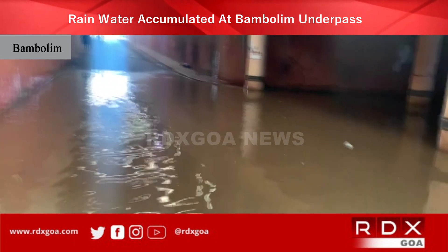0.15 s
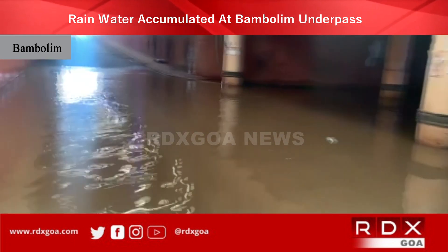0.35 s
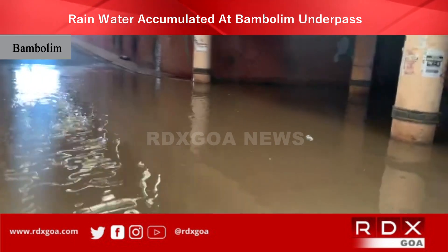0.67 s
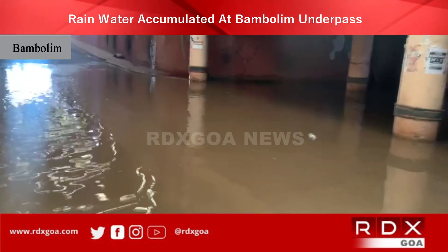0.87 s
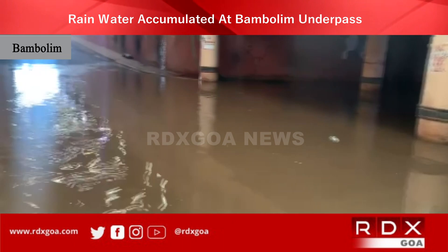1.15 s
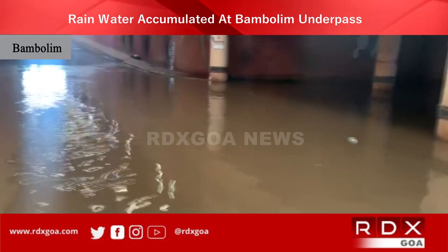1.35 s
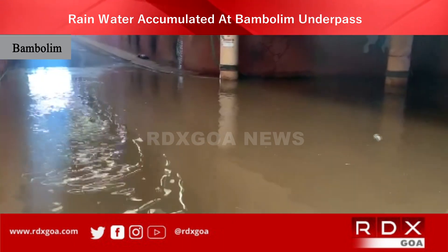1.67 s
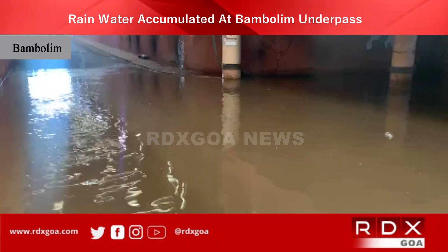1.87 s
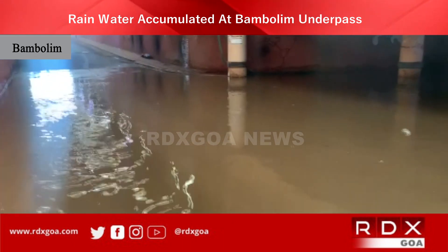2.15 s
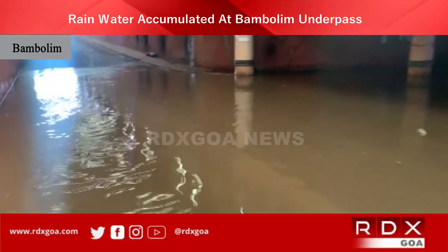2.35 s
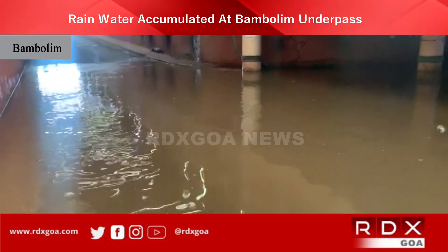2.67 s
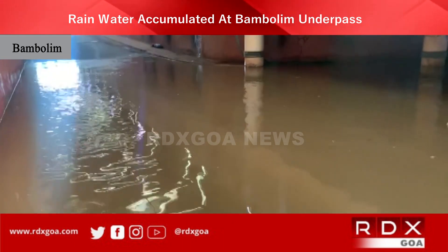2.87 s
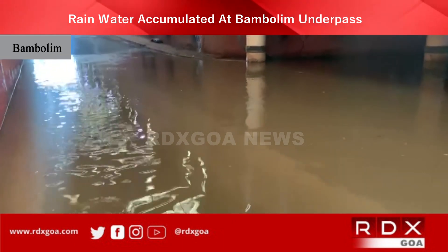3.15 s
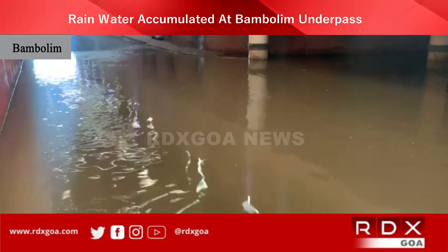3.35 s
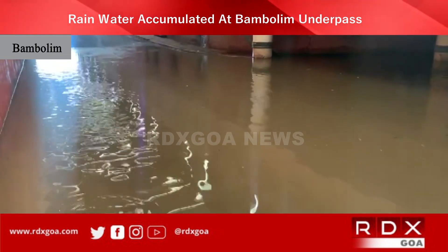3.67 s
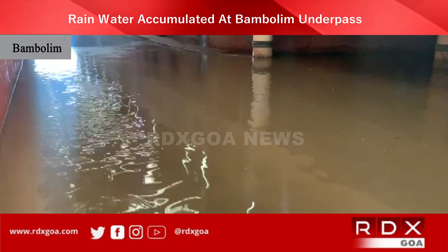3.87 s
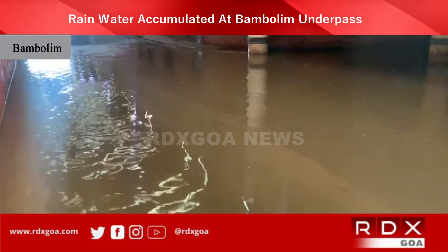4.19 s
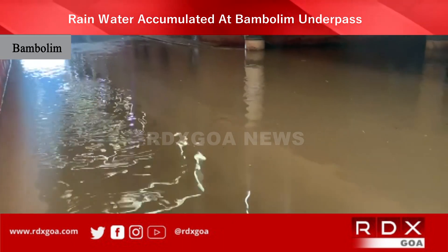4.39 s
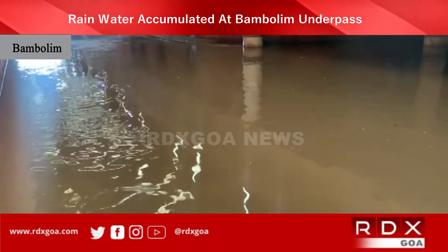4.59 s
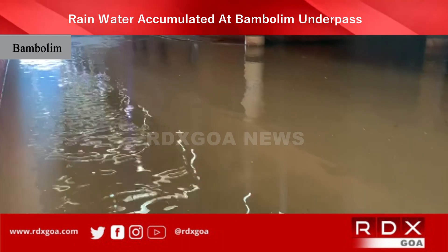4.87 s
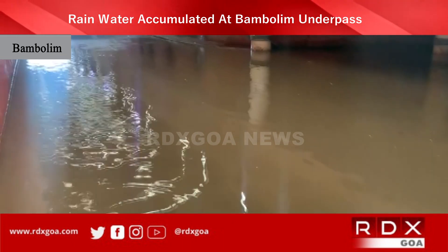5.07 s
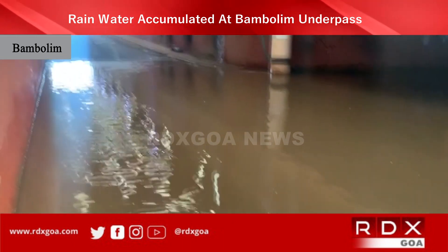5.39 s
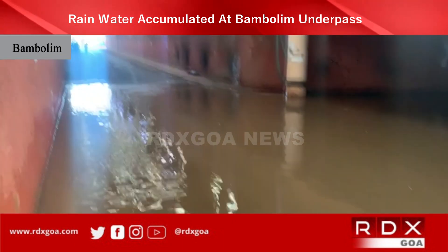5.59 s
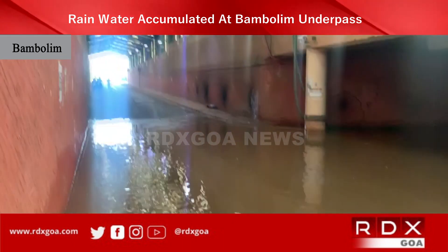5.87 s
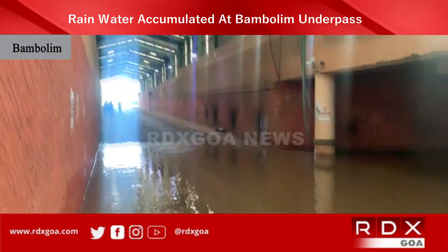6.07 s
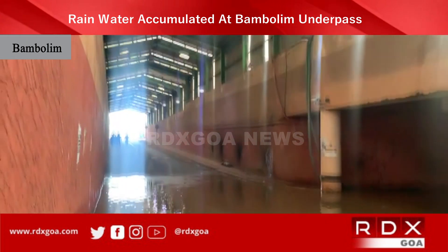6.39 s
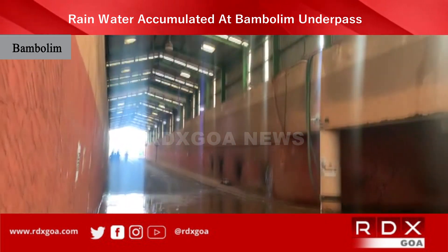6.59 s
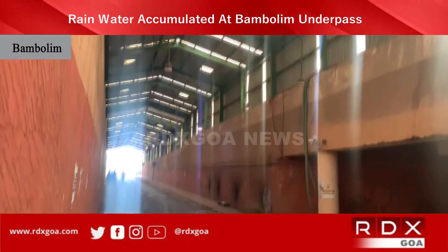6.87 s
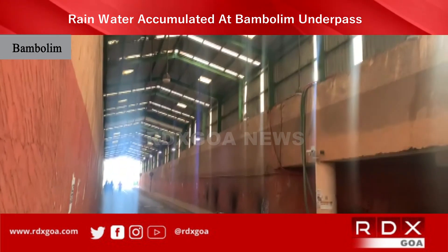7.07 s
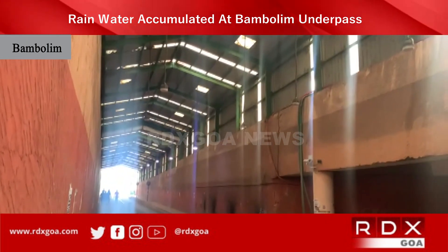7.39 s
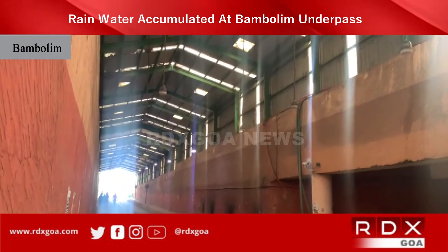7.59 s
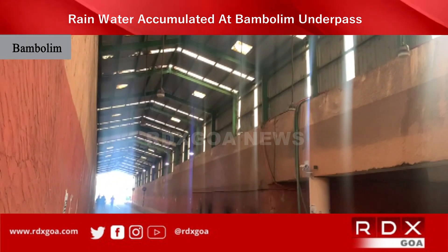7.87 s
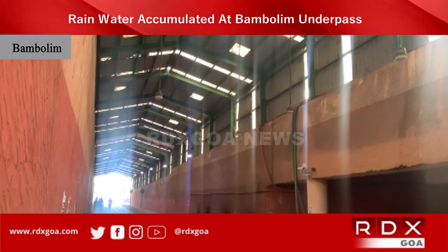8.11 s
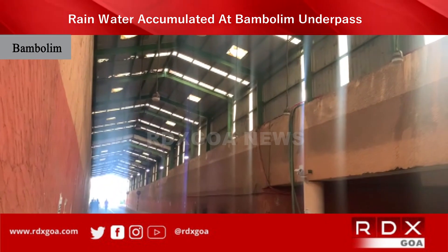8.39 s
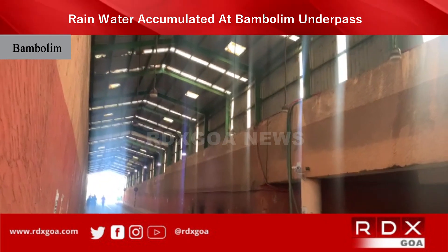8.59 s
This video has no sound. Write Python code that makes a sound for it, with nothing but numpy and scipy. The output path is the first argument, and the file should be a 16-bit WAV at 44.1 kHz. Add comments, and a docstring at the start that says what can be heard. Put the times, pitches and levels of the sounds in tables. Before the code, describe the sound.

A single-cylinder engine idles near the microphone in a flooded concrete underpass, about ten soft thuds a second, wavering in pace and booming off the walls. Quieter water churns behind it, surging around one and a half, five, six and eight seconds, with bubbles and tiny splashes. A far engine growl vanishes early; thin sizzle fades after three seconds. Distant traffic drones and whines.

```python
"""A single-cylinder engine idles in a flooded concrete underpass: each firing rings the exhaust and the
tunnel's standing waves, split into boom and thud; two higher bands clatter in the tunnel's dense echoes.
Wheels push through water: coloured noise with drops, lifted in surges, with bubble pings and noise splashes.
A thin sizzle of narrow-band noise fades out, and so does a far engine's growl of blurred partials.
Distant traffic whines in wavering, blurred tones over a deep drone of low noise."""
import sys
import numpy as np
from scipy import signal
from scipy.fft import rfft, irfft, next_fast_len
from scipy.io import wavfile
from scipy.ndimage import uniform_filter1d

SR = 44100
rng = np.random.default_rng(int(sys.argv[2]) if len(sys.argv) > 2 else 0)


def materialize(psi):
    """Save the field psi as 16-bit PCM at rate SR to the path in sys.argv[1].

    A 1-D psi becomes a single channel; in a 2-D psi each row is a channel.
    """
    bounded = np.clip(np.atleast_2d(psi).T, -1, 1)
    quanta = np.round(bounded * 32767).astype(np.int16)
    wavfile.write(sys.argv[1], SR, quanta)


N = 385434
TIME = np.arange(N) / SR

# Hunting idle. Each row: time in seconds, rate in firings per second.
FIRING_RATE = [(0.0, 9.61), (.3, 10), (.6, 10), (.85, 9.2), (1.15, 10.4), (1.45, 9.7), (1.8, 9.8),
               (2.1, 9.69), (2.45, 9.463), (3.1, 10.27), (3.96, 9.905), (4.73, 10.246), (5.11, 9.796),
               (5.77, 9.457), (6.175, 10.489), (6.5, 10.653), (6.88, 9.145), (7.25, 10.418), (8.04, 9.203),
               (8.74, 9.749)]
START_PHASE_FIRINGS = .001


def firings(uneven_db, stumble_s):
    """One impulse per firing, randomly uneven in strength and a little early or late."""
    phase = START_PHASE_FIRINGS + np.cumsum(curve(FIRING_RATE, column=1)) / SR
    at = np.flatnonzero(np.diff(np.floor(phase), prepend=-1))
    strength, lateness = rng.standard_normal((len(at), 2)).T
    late_samples = np.round(stumble_s * SR * lateness).astype(int)
    pushes = np.zeros(N)
    pushes[np.clip(at + late_samples, 0, N - 1)] = gain_of(uneven_db * strength)
    return pushes


# Exhaust push (first row), then tunnel standing waves.
# Each row: frequency in Hz, signed amplitude (relative), t60 in seconds.
FIRING_MODES = [(71.4, 2.0, .0078), (48.3, .0077, 2.1), (57.5, -.2, .59), (71.1, -.05, 2.5),
                (80.3, .055, 2.0), (115.8, .055, 1.4), (124.3, .116, 1.55), (136.8, -.02, .64)]
# Early wall echoes. Each row: delay in seconds, signed gain.
EARLY_ECHOES = [(.0236, -.3), (.0612, .1), (.0866, -.3), (.0902, -.28), (.1118, -.23)]
# Dulling of the direct beats. Each row: frequency in Hz, gain in dB.
BEAT_FILTER = [(15, -18), (40, -3), (55, 0), (78, 0), (92, -4), (110, 0), (135, 0), (170, -6), (210, -14),
               (400, -26), (2000, -45)]
# Deep boom. Each row: time in seconds, level in dB before the boom_db trim.
BOOM_LEVEL = [(0.0, -21.5), (1.2, -21), (1.7, -19), (2.3, -17.5), (3.5, -14), (3.95, -16.5), (4.75, -15),
              (6.0, -15.5), (8.74, -16.5)]
# Thud above the boom. Each row: time in seconds, level in dB before the dips.
THUD_LEVEL = [(0.3, -17.5), (.75, -21.3), (1.15, -19.6), (2.4, -21.8), (3.3, -21.3), (4.2, -19.3),
              (4.6, -20.2), (5.15, -20), (5.45, -18), (7.3, -20), (8.74, -18.8)]
# Brief thud dips. Each row: middle in seconds, half-length in seconds, change in dB.
THUD_DIP_ROWS = [(1.85, 0.25, -12.5), (3.62, 0.31, -4.5), (7.6, 0.079, -0.5)]


def beats(pushes, split_hz, boom_db):
    """Firings ring decaying modes; walls return them; boom and thud are split and levelled apart."""
    t = np.arange(2 * SR) / SR
    ring = np.zeros(len(t))
    for hz, size, t60 in FIRING_MODES:
        ring += size * np.exp(-np.log(1000) * t / t60) * np.sin(2 * np.pi * hz * t)
    lead = np.flatnonzero(pushes)[10]  # already running for ten beats
    direct = signal.fftconvolve(np.r_[pushes[:lead], pushes], ring)
    paths = [(0.00091, 0.94)] + EARLY_ECHOES  # direct path first
    near = sum(gain * direct[lead - round(s * SR):][:N] for s, gain in paths)
    reverberant = near + gain_of(-13) * tunnel(near, t60=1.3, change_per_s=.15)
    sound = coloured(reverberant, BEAT_FILTER)
    boom = signal.sosfiltfilt(signal.butter(4, split_hz, fs=SR, output="sos"), sound)
    thud = sound - boom
    boom_level_db = curve(BOOM_LEVEL, column=1) + boom_db
    thud_level_db = curve(THUD_LEVEL, column=1) + swells(THUD_DIP_ROWS)
    return steadied(boom) * gain_of(boom_level_db) + steadied(thud) * gain_of(thud_level_db)


# Clatter's two ring spectra. Each row: frequency in Hz, relative level in dB.
LOW_RING_SPECTRUM = [(40, -52), (110, -20), (142, 6), (168, 5), (205, -.5), (227, 2), (241, 7), (257, 1.5),
                     (273, 3), (290, -4), (310, -13), (360, -34), (1000, -100)]
UPPER_RING_SPECTRUM = [(100, -65), (270, -20), (315, -0.5), (340, 5), (365, 1), (415, 5.5), (460, -1.5),
                       (510, -14), (700, -14.5), (1500, -67), (5000, -100)]
# Ring dips and swells. Each row: middle in seconds, half-length in seconds, change in dB.
LOW_RING_DIP_ROWS = [(3.9, 0.8, -2)]
UPPER_RING_SWELL_ROWS = [(4.2, 1.1, 1.5)]
LOW_RING_START_DB, LOW_RING_SINK_DB_PER_S = -26.5, 0.5
UPPER_RING_START_DB, UPPER_RING_SINK_DB_PER_S = -31.5, 0.48  # at the idle rate
IDLE_FIRINGS_PER_S, EFFORT_DB_PER_FIRING_PER_S = 9.9, 2.5


def clatter(pushes, gas_db):
    """Tunnel echoes draw the firings' higher rings into partials that move with the idle, over a gas rush."""
    echoes = evened(tunnel(pushes, t60=1.9, change_per_s=.45))
    gas = evened(paired(rng.standard_normal((2, N))))
    drive = echoes + gain_of(gas_db) * gas
    low_db = LOW_RING_START_DB - LOW_RING_SINK_DB_PER_S * TIME + swells(LOW_RING_DIP_ROWS)
    effort_db = EFFORT_DB_PER_FIRING_PER_S * (curve(FIRING_RATE, column=1) - IDLE_FIRINGS_PER_S)
    upper_db = UPPER_RING_START_DB - UPPER_RING_SINK_DB_PER_S * TIME + effort_db
    upper_db = upper_db + swells(UPPER_RING_SWELL_ROWS)
    low = steadied(coloured(drive, LOW_RING_SPECTRUM)) * gain_of(low_db)
    upper = steadied(coloured(drive, UPPER_RING_SPECTRUM)) * gain_of(upper_db)
    return low + upper


# Water spectra. Each row: frequency in Hz, relative level in dB.
ROAR_SPECTRUM = [(150, -11), (350, 0.5), (520, 2), (800, -1), (1000, -7.5), (1500, -24.5), (3000, -52),
                 (8000, -100)]
WASH_SPECTRUM = [(500, -18), (800, 0.5), (1050, 5), (1250, 4.5), (1500, 2), (1800, 1.5), (2100, -2.5),
                 (2700, -4), (3200, -22), (4500, -24.5), (8000, -75), (12000, -93.5)]
SPRAY_SPECTRUM = [(1500, -2), (3000, 7.5), (3800, 6.5), (4500, 4.5), (5200, -2.5), (6300, 2.5), (7400, -11),
                  (8200, -4), (9000, -11.5), (10800, -14.5), (11800, -32.5), (14000, -43)]
# Roar swells. Each row: middle in seconds, half-length in seconds, change in dB.
ROAR_SWELL_ROWS = [(.3, 0.54, 1.8), (8.35, 0.77, 3.5)]
ROAR_BASE_DB, WASH_BASE_DB = -37, -38  # before swells, surges and flicker
SPRAY_START_DB, SPRAY_SINK_DB_PER_S = -43, 0.27  # before surges
SPRAY_SURGE_SHARE = 0.58  # of the wash's surge lift in dB


def floodwater():
    """Wheels plough the flood: a dull roar, the wash of the bow wave, and fine spray."""
    roar = churn(ROAR_SPECTRUM, drops_per_s=240, spread_db=1.0, drops_db=-10.5, patchy_db=4.0)
    wash = churn(WASH_SPECTRUM, drops_per_s=640, spread_db=0.0, drops_db=-7.5, patchy_db=2.7)
    spray = churn(SPRAY_SPECTRUM, drops_per_s=760, spread_db=-4.0, drops_db=-11.0, patchy_db=4.0)
    lift_db = surging()
    roar_db = ROAR_BASE_DB + swells(ROAR_SWELL_ROWS)
    wash_db = WASH_BASE_DB + lift_db + flicker(depth_db=.8, rate_hz=11)
    spray_db = SPRAY_START_DB - SPRAY_SINK_DB_PER_S * TIME + SPRAY_SURGE_SHARE * lift_db
    return roar * gain_of(roar_db) + wash * gain_of(wash_db) + spray * gain_of(spray_db)


def churn(colour, drops_per_s, spread_db, drops_db, patchy_db):
    """Churned water: random drops, each a short decaying noise burst, over a steady diffuse hiss."""
    sizes = gain_of(spread_db * np.minimum(rng.exponential(1, (2, N)), 5))
    clicks = sizes * rng.standard_normal((2, N)) * (rng.random((2, N)) < drops_per_s / SR)
    burst = np.exp(-np.arange(400) / 70)  # power decay, in samples
    power = abs(signal.oaconvolve(clicks ** 2, burst[None], axes=1)[:, :N])
    drops = np.sqrt(power) * rng.standard_normal((2, N))
    hiss = rng.standard_normal((2, N))
    water = paired(hiss + gain_of(drops_db) * evened(drops))
    return evened(coloured(uneven_texture(water, patchy_db), colour))


def uneven_texture(x, patchy_db):
    """Uneven texture: random time-frequency patches lift or lower narrow bands."""
    z = signal.stft(x, nperseg=1024, noverlap=768)[2]
    patches = rng.standard_normal(z.shape[1:])
    patches = uniform_filter1d(uniform_filter1d(patches, size=3, axis=0), size=6, axis=1)
    return signal.istft(z * gain_of(patchy_db * evened(patches)), nperseg=1024, noverlap=768)[1][:, :N]


# Wheel-pushed surges, power-added to the wash.
# Each row: start in seconds, rise in seconds, level in dB, ebb in dB per second.
SURGE_ROWS = [(1.47, .07, -38.3, 1.2), (5.08, .1, -37, 1.4), (6.05, 0.5, -37, 10), (8.0, 0.12, -39.5, 4.5)]


def surging():
    """Lift of the wash in dB: each surge's power rises from its start, then ebbs exponentially."""
    power = np.ones(N)
    for start, rise, db, ebb in SURGE_ROWS:
        age = np.maximum(TIME - start, 0)
        surge_db = db - WASH_BASE_DB - ebb * np.maximum(age - rise, 0)
        power += np.minimum(age / rise, 1) * gain_of(surge_db) ** 2
    return 10 * np.log10(power)


def flicker(depth_db, rate_hz):
    """Random flicker of the wash level, in dB."""
    return depth_db * wavering(rate_hz)


BUBBLES_PER_S, BUBBLES_BASE_DB = 160, -47.5  # level before surges
BUBBLE_LOW_HZ, BUBBLE_HIGH_HZ = 603, 3210  # starting pitch


def bubbles(spread_db, t60, tilt_db):
    """Bubbles ping as rising, decaying sines, small ones softer; the tunnel draws each out."""
    t = np.arange(SR // 16) / SR
    out = np.zeros(N + len(t))
    for when, pitch, size in rng.random((round(BUBBLES_PER_S * N / SR), 3)):
        hz = BUBBLE_LOW_HZ * (BUBBLE_HIGH_HZ / BUBBLE_LOW_HZ) ** pitch
        envelope = np.exp(-t * hz / 20) * np.minimum(t * hz / 2, 1)
        ping = np.sin(2 * np.pi * hz * t * (1 + t)) * envelope
        out[int(when * N):][:len(t)] += gain_of(spread_db * size + tilt_db * pitch) * ping
    echoed = evened(tunnel(out[:N], t60=t60, change_per_s=0.401))
    return gain_of(BUBBLES_BASE_DB + surging()) * echoed


# Near splashes. Each row: start in seconds, level in dB before rise and decay, t60 in seconds.
SPLASH_ROWS = [(1.275, -48, .12), (3.45, -47, 0.081), (5.083, -45, 0.22)]


def splashes(rise_s):
    """Small bright splashes close by: treble noise with a fast rise and exponential decay."""
    level = np.zeros(N)
    for s, db, t60 in SPLASH_ROWS:
        age = np.maximum(TIME - s, 0)
        level += gain_of(db) * (1 - np.exp(-age / rise_s)) * np.exp(-np.log(1000) * age / t60)
    # Each row: frequency in Hz, relative level in dB.
    colour = [(1500, -20), (4000, -1), (7000, 0), (9500, -6), (11000, -13), (12000, -27), (14000, -43)]
    return level * evened(coloured(rng.standard_normal((2, N)), colour))


# Sizzle flares. Each row: middle in seconds, half-length in seconds, change in dB.
SIZZLE_FLARE_ROWS = [(.2, 0.22, 4.5), (2.08, 0.17, 5.5)]
SIZZLE_HZ, SIZZLE_BASE_DB = 3524, -49.5  # level before flares and fade
SIZZLE_HOLD_S, SIZZLE_FADE_DB_PER_S = 3.0, 25.5


def sizzle(width_hz):
    """A thin, patchy, high narrow-band hiss that holds, then fades out."""
    tone = fuzzy_tone(np.full(N, SIZZLE_HZ), width_hz)
    hiss = evened(uneven_texture(tone, patchy_db=2.3))
    fade_db = SIZZLE_FADE_DB_PER_S * np.maximum(TIME - SIZZLE_HOLD_S, 0)
    return hiss * gain_of(SIZZLE_BASE_DB + swells(SIZZLE_FLARE_ROWS) - fade_db)


# Far engine's partials. Each row: frequency in Hz, level in dB before the fade.
GROWL_PARTIALS = [(274.5, -32), (334, -41), (398, -40), (465, -43), (544, -42), (633, -38.5), (748, -42),
                  (824, -47)]
GROWL_HOLD_S, GROWL_FADE_DB_PER_S, GROWL_WIDTH_HZ = .25, 32, 16


def growl():
    """A far engine's partials, blurred by the tunnel, hold briefly and fade together."""
    fade_db = GROWL_FADE_DB_PER_S * np.maximum(TIME - GROWL_HOLD_S, 0)
    partials = np.zeros((2, N))
    for hz, db in GROWL_PARTIALS:
        partials += gain_of(db) * steadied(fuzzy_tone(np.full(N, hz), GROWL_WIDTH_HZ))
    return gain_of(-fade_db) * partials


# Distant whines and squeals. Each row: start in seconds, length in seconds, frequency in Hz,
# width in Hz, level in dB before the level_db trim.
WHINE_ROWS = [(.8, .43, 823, 130, -45), (.92, .35, 705, 24, -46), (1.49, .2, 900, 160, -41),
              (1.52, .15, 1160, 100, -42), (1.72, .3, 1800, 100, -47), (2.5, .33, 1800, 130, -47),
              (3.05, .6, 1183, 60, -46.5), (5.11, .18, 1490, 18, -41), (5.16, .18, 986, 14, -43),
              (5.2, .28, 850, 22, -46), (6.35, .95, 990, 22, -45.5), (7.5, .3, 990, 14, -48),
              (8.14, .5, 832, 14, -43), (8.2, .35, 978, 30, -49), (-1, 11, 4382, 14, -64.5)]
CLEAR_WIDTH_HZ = 14  # clear tone and blur share power equally at this width


def whines(level_db):
    """Wavering tones in blurred echo: most far whines swell and die; one faint high whine lasts throughout."""
    out = np.zeros((2, N))
    for start, length, hz, width, db in WHINE_ROWS:
        on = np.flatnonzero((TIME > start) & (TIME < start + length))
        swell = np.sqrt(abs(np.sin(np.pi * (TIME[on] - start) / length)))
        pitch = hz + CLEAR_WIDTH_HZ / 4 * wavering(rate_hz=5)[on]
        cycles = np.cumsum(pitch) / SR + rng.random((2, 1)) / 2
        clear = np.sqrt(2) * np.sin(2 * np.pi * cycles)
        share = 1 / (1 + (width / CLEAR_WIDTH_HZ) ** 2)  # narrow whines are clearest
        tone = np.sqrt(share) * clear + np.sqrt(1 - share) * fuzzy_tone(pitch, width)
        out[:, on] += gain_of(db + level_db) * swell * tone
    return out


RUMBLE_FINAL_DB = -27.5


def rumble(quiet_db, build_s):
    """Faint deep drone of traffic: low noise that builds up, then holds."""
    # Each row: frequency in Hz, relative level in dB.
    colour = [(5, -11), (16, -10), (30, -5), (45, -1.5), (75, -1), (100, 2), (150, 1),
              (250, -17), (600, -80), (2000, -100)]
    level = gain_of(RUMBLE_FINAL_DB + quiet_db * np.exp(-TIME / build_s))
    return level * evened(coloured(paired(rng.standard_normal((2, N))), colour))


def tunnel(x, t60, change_per_s):
    """Dense echoes whose pattern changes slowly as the water ripples and the microphone moves."""
    t = np.arange(SR) / SR
    lead_in = np.r_[x[:SR], x]  # already ringing at the start
    out = np.zeros((2, N))
    for k in range(3):
        tail = paired(rng.standard_normal((2, SR))) * gain_of(-60 * t / t60)
        tail = tail / np.linalg.norm(tail[0])
        wet = signal.fftconvolve(lead_in[None], tail, axes=1)[:, SR:SR + N]
        out += wet * np.cos(np.pi * (change_per_s * TIME + k / 3)) * np.sqrt(2 / 3)
    return out


# Likeness of the two channels. Each row: frequency in Hz, correlation (-1 to 1).
CHANNEL_CORRELATION = [(20, 0.026), (100, 0.65), (180, 0.54), (280, 0.19), (500, 0.072), (2000, -0.1),
                       (4000, 0.19), (14000, 0.043)]


def paired(x):
    """Mixes two unrelated signals into a diffuse stereo field, correlated by frequency."""
    size = next_fast_len(x.shape[-1])
    left, other = rfft(x, size)
    same = np.clip(read(CHANNEL_CORRELATION, np.fft.rfftfreq(size, 1 / SR)), -1, 1)
    right = same * left + np.sqrt(1 - same ** 2) * other
    return irfft(np.array([left, right]), size)[:, :x.shape[-1]]


def fuzzy_tone(hz, width_hz):
    """A tone on pitch curve hz, blurred as by many echoes: low-passed complex noise shifted up."""
    real, imag = rng.standard_normal((2, 2, len(hz) + 4000))  # extra samples settle the filter
    r = np.exp(-np.pi * width_hz / SR)
    blur = signal.lfilter([1 - r], [1, -2 * r, r * r], real + 1j * imag)[:, -len(hz):]
    return evened((blur * np.exp(2j * np.pi * np.cumsum(hz) / SR)).real)


def wavering(rate_hz):
    """A slow random curve of rms 1."""
    knots = np.arange(0, N / SR + 1, 1 / (2 * rate_hz))
    return evened(np.interp(TIME, knots, rng.standard_normal(len(knots))))


def swells(rows):
    """Bell-shaped level rises or dips, in dB."""
    return sum(db * np.exp(-((TIME - middle) / half) ** 2) for middle, half, db in rows)


def steadied(x):
    """Takes out slow swells, keeps the beats."""
    power = uniform_filter1d(uniform_filter1d((x ** 2).mean(0), size=13230), size=4410)
    return x / np.sqrt(power + 1e-12)


def coloured(x, points):
    """Filters by a (Hz, dB) table."""
    size = next_fast_len(x.shape[-1] + 8192)
    gain = gain_of(read(points, np.fft.rfftfreq(size, 1 / SR)))
    return irfft(rfft(x, size) * gain, size)[..., :x.shape[-1]]


def read(points, hz):
    """Interpolates a spectrum table on a log-frequency axis."""
    f, value = np.transpose(points)
    return np.interp(np.log(hz + 1), np.log(f + 1), value)


def curve(rows, column):
    """One column of a time table, at every sample."""
    rows = np.array(rows)
    return np.interp(TIME, rows[:, 0], rows[:, column])


def evened(x):
    """Scales to rms 1."""
    return x / np.sqrt(np.mean(x ** 2) + 1e-20)


def gain_of(db):
    """Decibels to amplitude gain."""
    return 10 ** (np.asarray(db) / 20)


def scene():
    """The idling engine near by, the water and traffic farther in."""
    pushes = firings(uneven_db=.7, stumble_s=.00025)
    engine = beats(pushes, split_hz=95, boom_db=-1.2)
    engine = engine + clatter(pushes, gas_db=-13)
    water = floodwater() + bubbles(spread_db=10.5, t60=.25, tilt_db=-2.5) + splashes(rise_s=0.0034)
    far = rumble(quiet_db=-3, build_s=1.1) + growl() + sizzle(width_hz=280) + whines(level_db=2.0)
    return engine + water + far


# Right channel's tone: brighter treble above 8 kHz. Each row: frequency in Hz, gain in dB.
RIGHT_CHANNEL_TONE = [(80, 2.2), (130, 1.4), (350, 1.9), (600, .2), (7900, 0), (8100, 10), (9200, 12),
                      (10000, 6), (11000, -2), (11800, 0), (12600, 15)]
KNEE, HEADROOM = .6, .3  # amplitude, full scale 1
EDGE_HZ = 14200


def record(dry):
    """Soft ends, the right channel's tone, a soft ceiling on peaks, then the band limit."""
    fade_s = .003
    fade = np.clip(np.minimum(TIME, TIME[::-1]) / fade_s, 0, 1)
    dry = dry * np.sin(np.pi / 2 * fade) ** 2
    stereo = np.array([dry[0], coloured(dry[1], RIGHT_CHANNEL_TONE)])
    clean = np.clip(stereo, -KNEE, KNEE)
    stereo = clean + HEADROOM * np.tanh((stereo - clean) / HEADROOM)
    low_pass = signal.firwin(511, EDGE_HZ, window=("kaiser", 9), fs=SR)
    return signal.oaconvolve(stereo, low_pass[None], "same")


dry = scene()
out = record(dry)
materialize(out)
```